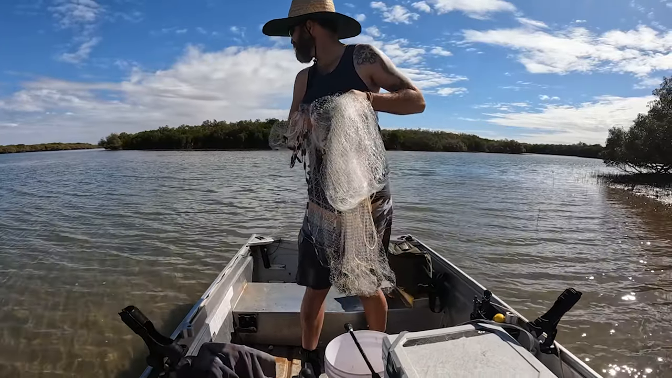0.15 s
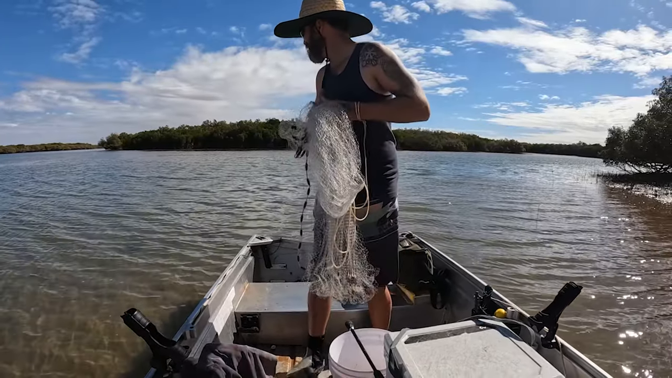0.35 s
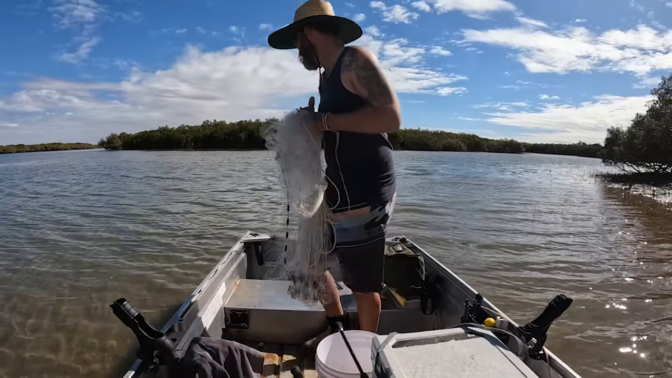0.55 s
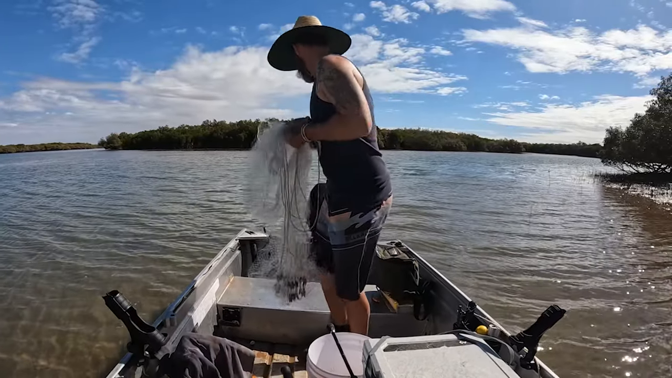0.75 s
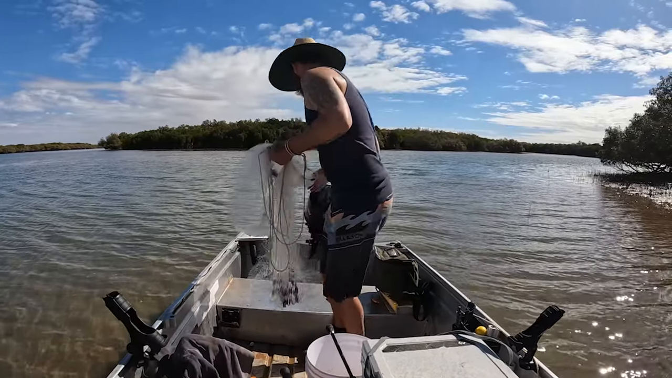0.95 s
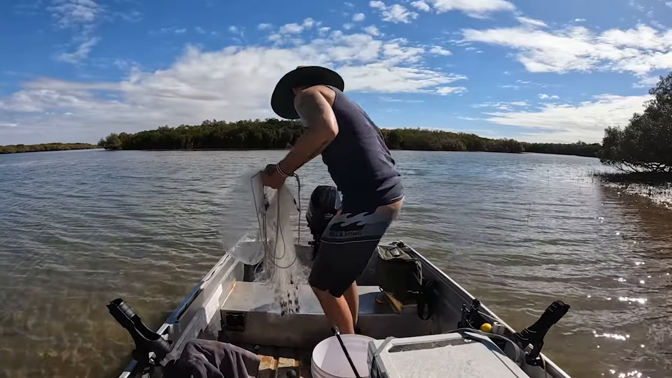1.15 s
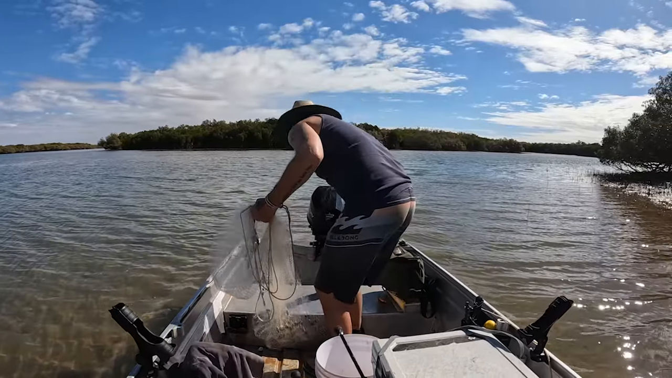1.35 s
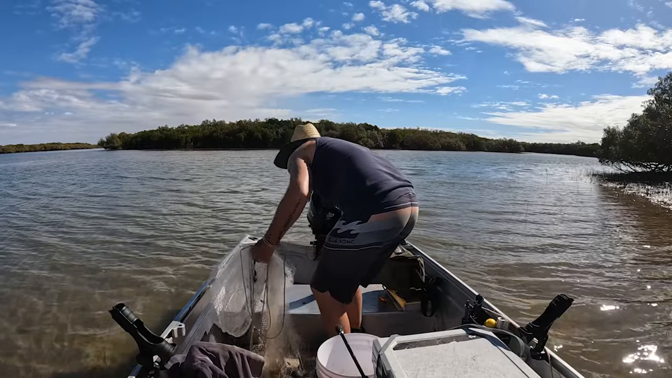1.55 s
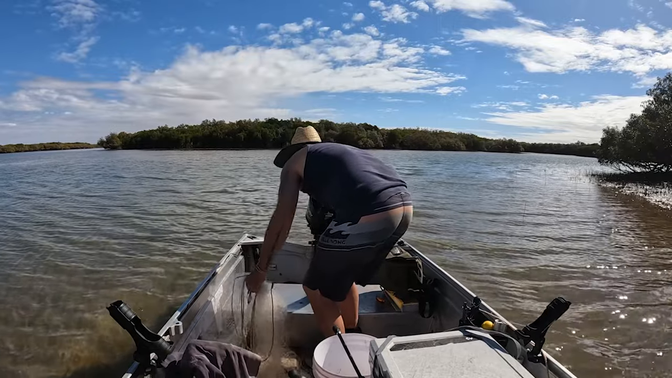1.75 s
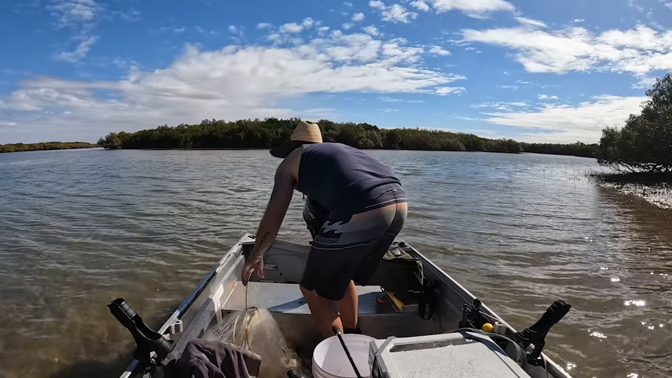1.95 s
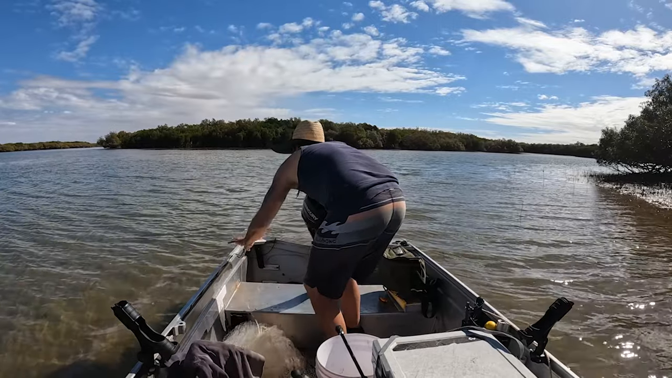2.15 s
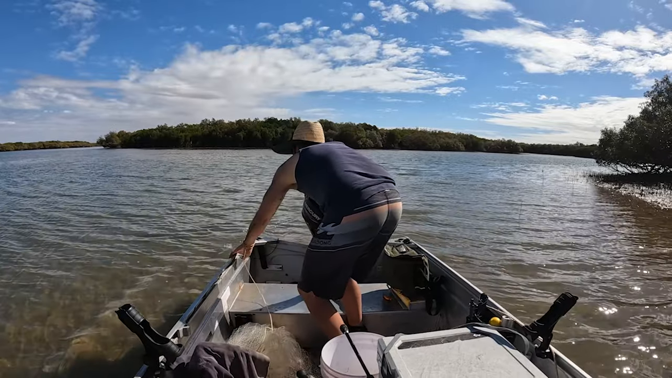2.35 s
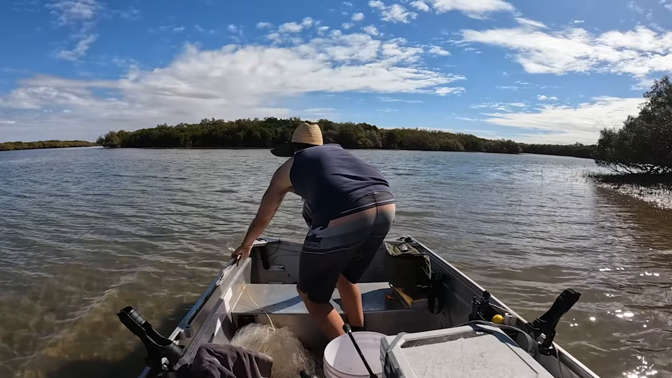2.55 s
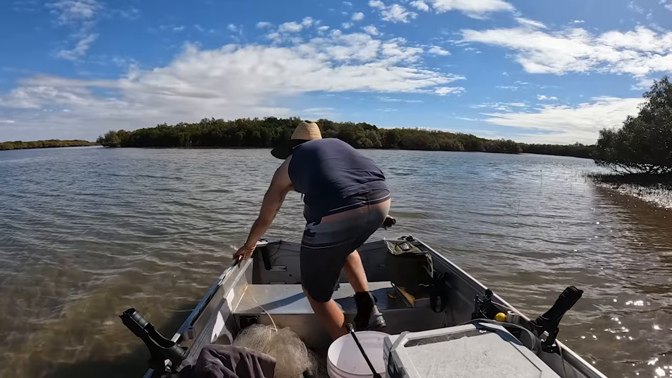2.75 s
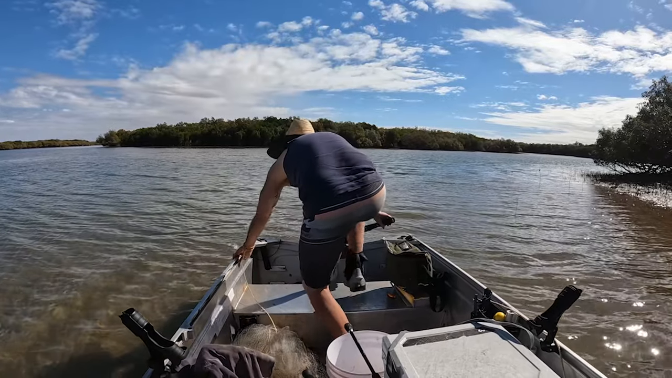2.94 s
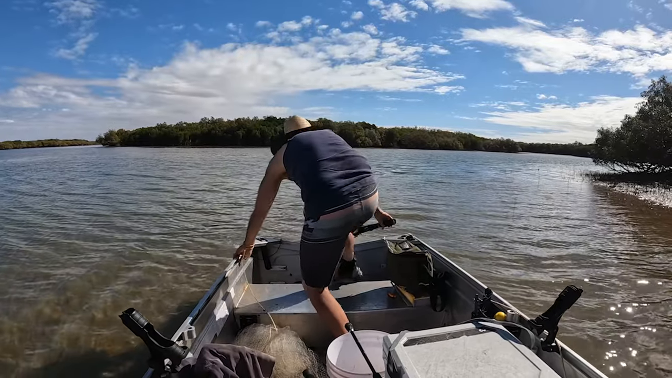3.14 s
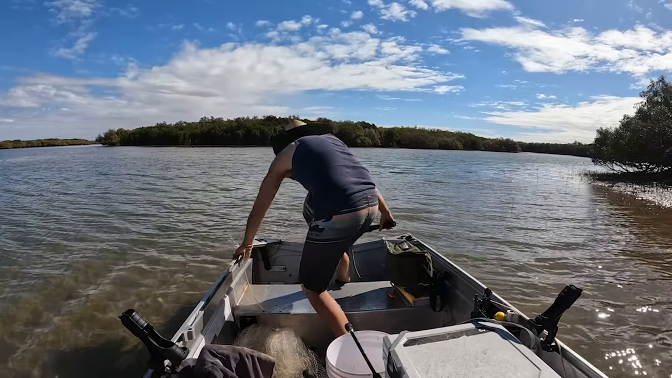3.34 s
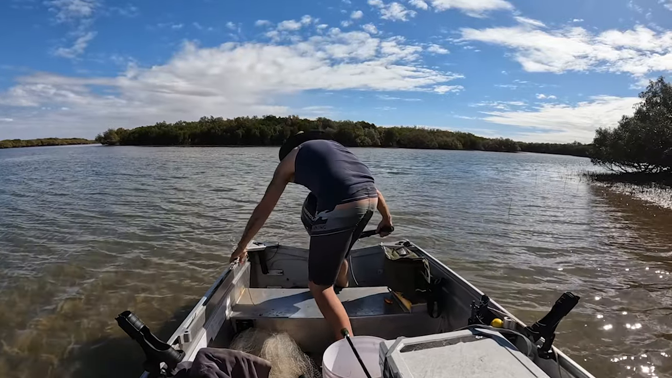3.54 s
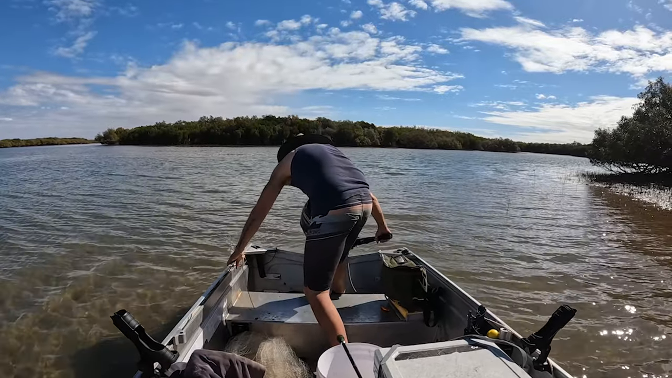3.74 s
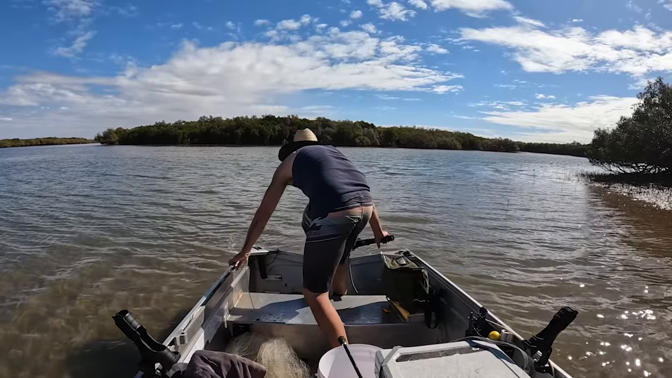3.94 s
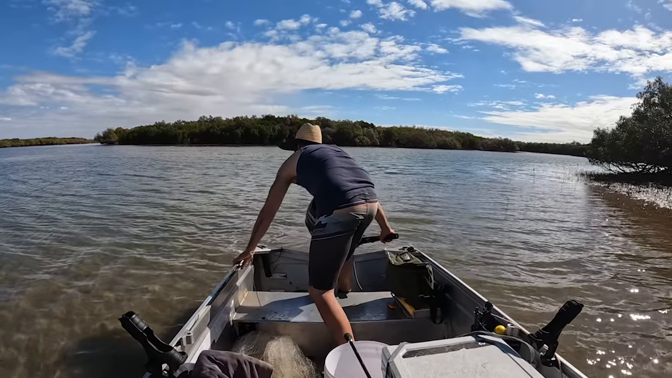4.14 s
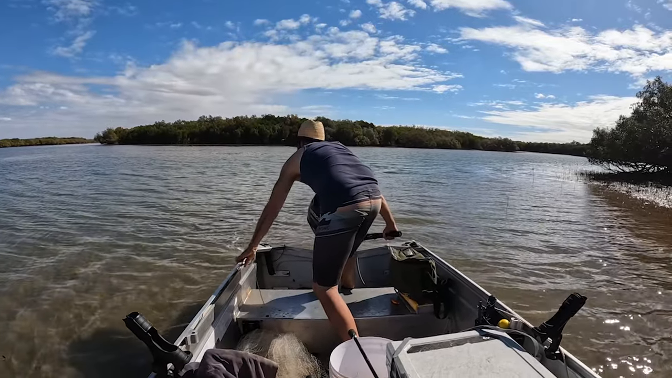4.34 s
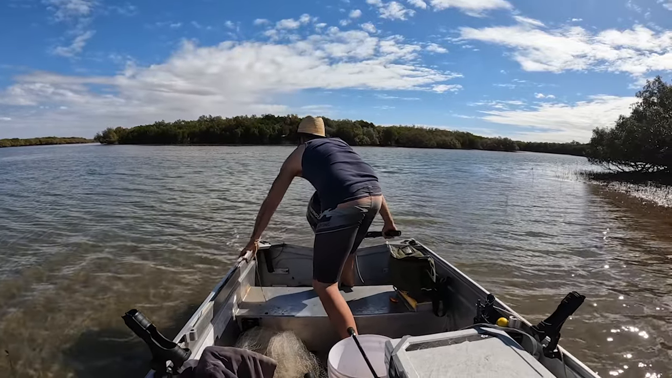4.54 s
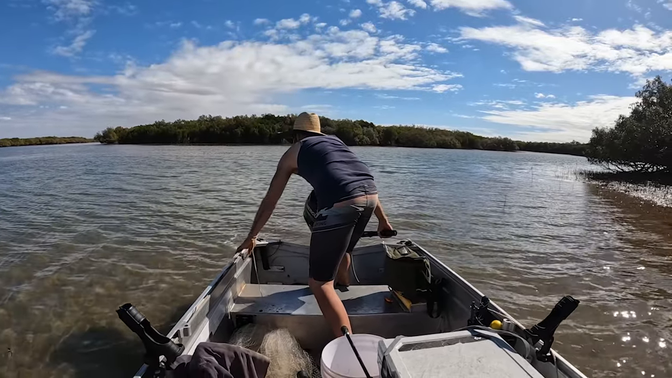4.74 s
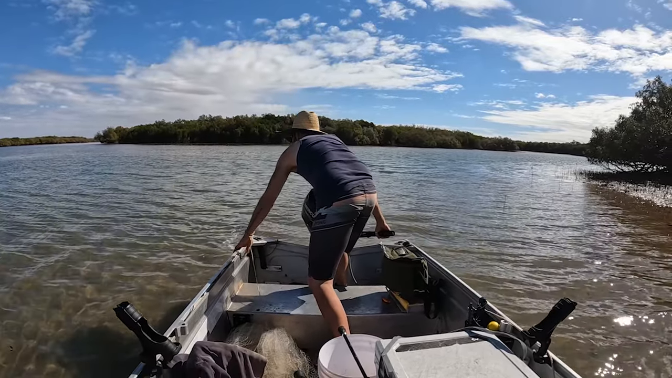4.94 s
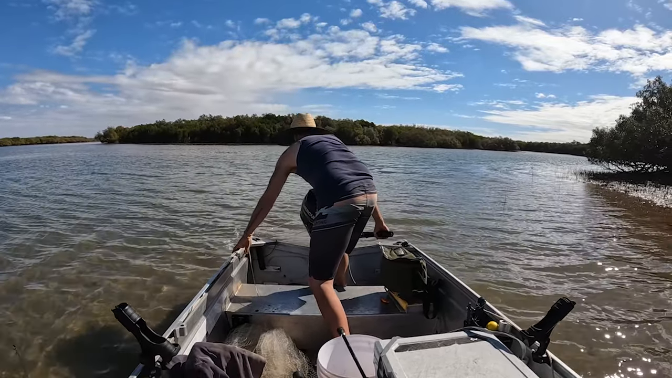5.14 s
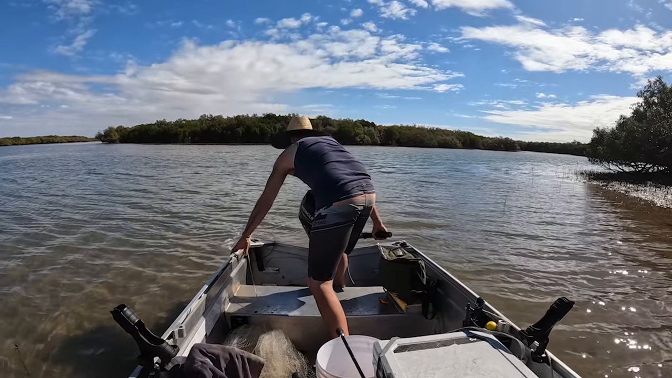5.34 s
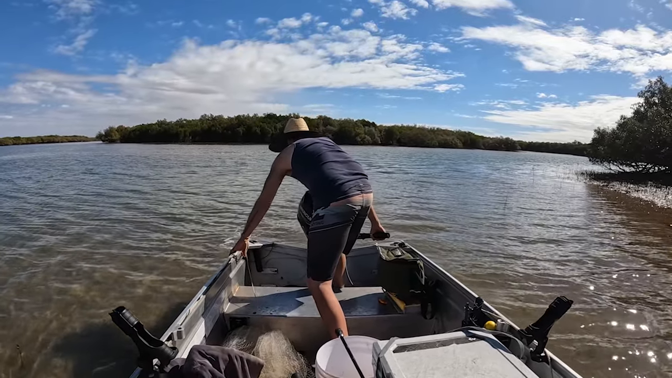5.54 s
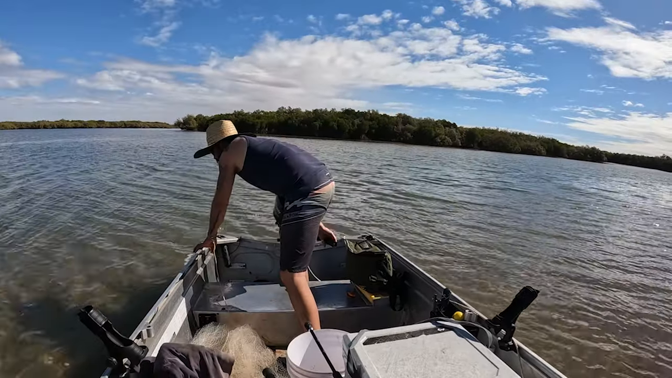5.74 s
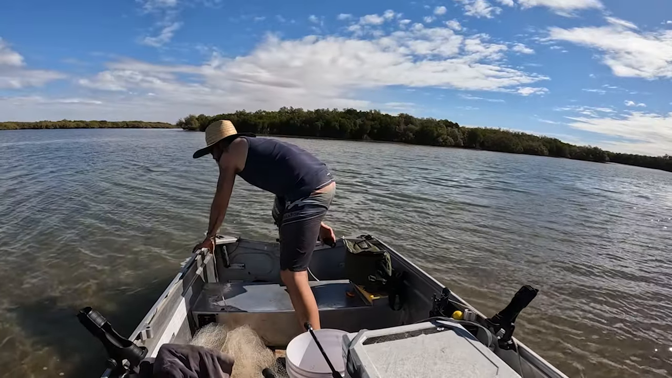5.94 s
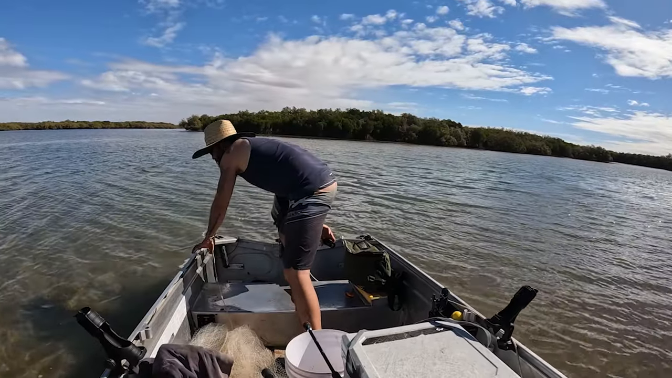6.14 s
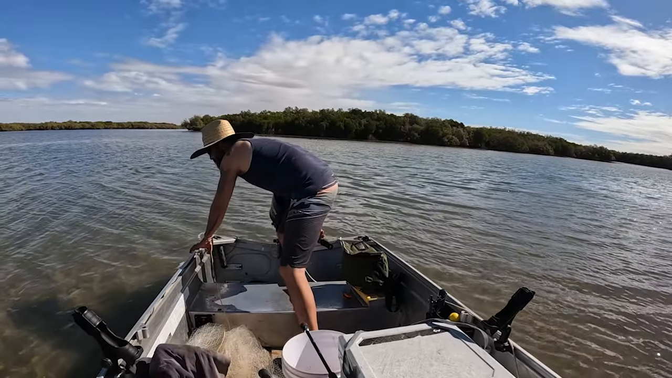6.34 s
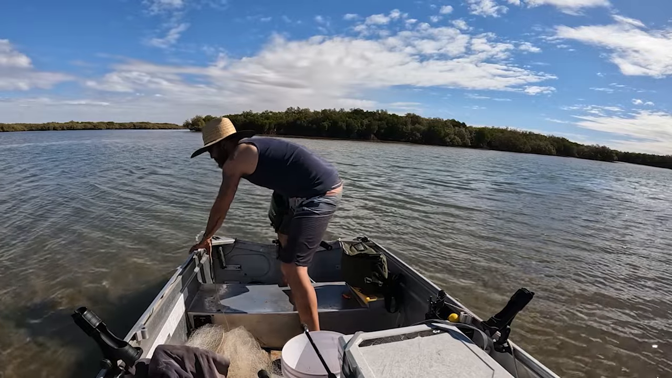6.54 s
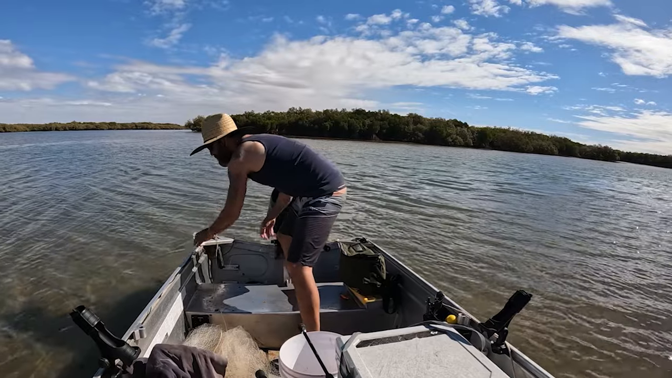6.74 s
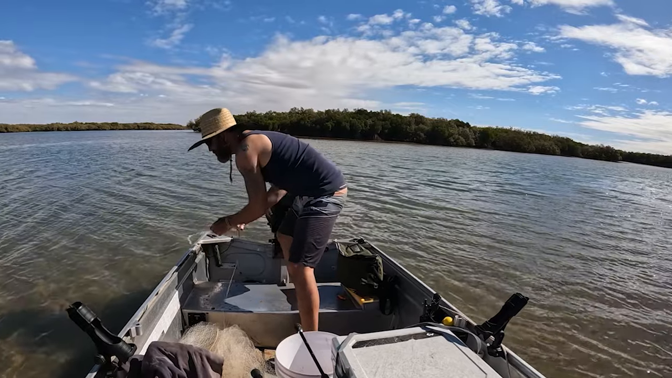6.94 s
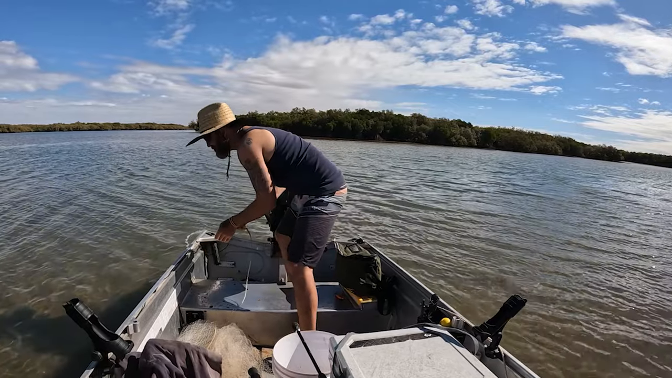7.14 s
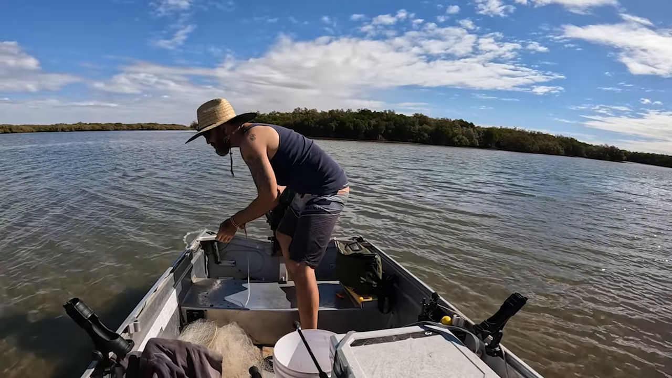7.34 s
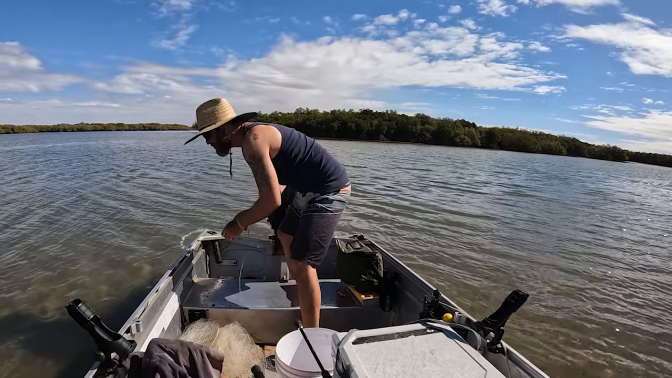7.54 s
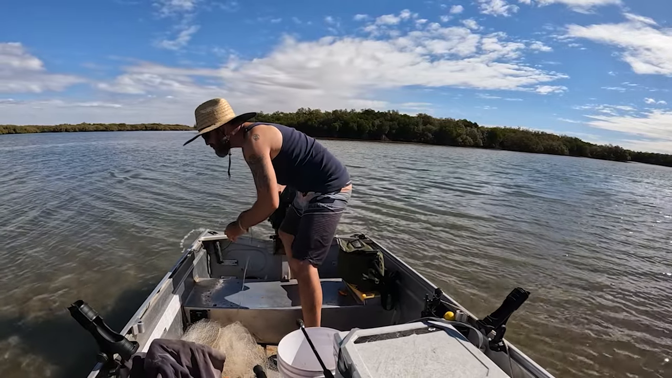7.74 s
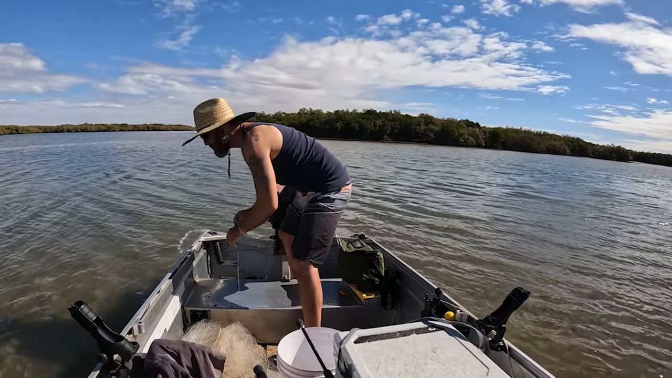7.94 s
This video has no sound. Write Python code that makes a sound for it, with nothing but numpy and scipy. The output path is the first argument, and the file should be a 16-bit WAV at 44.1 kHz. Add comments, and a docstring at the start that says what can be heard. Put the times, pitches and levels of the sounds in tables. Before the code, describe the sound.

Wet mesh rustles and lead weights clatter loudly into a ringing aluminium boat, hollow foot thuds, an idling outboard chugging, water lapping, wind rumbling.

```python
"""A man gathers a wet cast net in a small aluminium dinghy: mesh rustles in bursts of tiny snaps, feet thud.
Its lead weights drop on the floor, densest near 2 s, as noise clattering through ringing hull plates.
The idling outboard (rings and noise bands once a turn) swells early, is muffled after 2.2 s, returns from 5.3 s.
He steps to the stern meanwhile; wet hands and soles squeak now and then as gliding narrow-band noise.
Coloured noise throughout: water laps and bubbles, air hisses, wind rumbles on the microphone."""
import sys
import numpy as np
from scipy import signal
from scipy.fft import rfft, irfft
from scipy.io import wavfile
from scipy.ndimage import uniform_filter1d

SR = 44100
rng = np.random.default_rng(int(sys.argv[2]) if len(sys.argv) > 2 else 0)


def generate_wav(sig):
    """Save sig (samples, or channels by samples) to the path in sys.argv[1] as 16-bit PCM at SR."""
    pcm = np.round(np.clip(np.atleast_2d(sig).T, -1, 1) * 32767).astype(np.int16)
    wavfile.write(sys.argv[1], SR, pcm)


N = 352353
TIME = np.arange(N) / SR

# showers of lead weights landing: (time [s], level [dB], pouring time [s], low-pass corner [Hz])
SHOWERS = [(0.435, -36.5, 0.072, 900), (0.765, -27, 0.044, 3380), (.84, -38.5, 0.17, 1000),
           (1.511, -30.5, 0.0068, 1800), (1.68, -21, 0.0017, 1400), (1.698, -19.5, 0.044, 4500),
           (1.768, -23, 0.048, 3970), (1.857, -27.5, 0.015, 990), (1.997, -32, 0.011, 2980),
           (2.068, -19, 0.053, 7500), (2.14, -18, 0.01, 3500), (2.172, -17, 0.0048, 3400),
           (2.209, -29.5, 0.011, 694), (2.321, -35.5, 0.024, 1500), (2.574, -46.5, 0.035, 3970),
           (4.383, -39.5, 0.025, 3000)]
# spells of free exhaust: (opens [s], closes [s], swell time [s], exhaust level [dB], ticking level [dB])
OPEN_SPELLS = [(.12, 2.233, 1.7, -37, -61), (5.28, 8.0, 1.83, -36, -51.5)]

TURNS_PER_S, FIRST_TURN_S = 18.985, 0.041
SHOWER_RISE_S, SHOWER_SETTLE_S = 0.009, 0.013


def from_db(db):
    """Decibels to gain."""
    return 10 ** (np.asarray(db) / 20)


def rms_one(x):
    """Scale to unit power."""
    return x / np.sqrt(np.mean(x ** 2) + 1e-20)


def in_time(rows):
    """One curve per column, joined by straight lines."""
    s, *columns = np.transpose(rows)
    return [np.interp(TIME, s, c) for c in columns]


def colour(x, points):
    """Causal (minimum-phase) filter with the given (Hz, dB) response."""
    size = 2 ** 19
    hz, db = np.transpose(points)
    bin_hz = np.arange(size // 2 + 1) * SR / size
    log_gain = np.log(from_db(np.interp(np.log(bin_hz + 1), np.log(hz), db)))
    # fold the cepstrum onto positive time
    cepstrum = irfft(log_gain)[:size // 2]
    response = np.exp(2 * rfft(cepstrum, size) - cepstrum[0])
    return irfft(rfft(x, size) * response)[:len(x)]


def resonance(x, hz, width_hz):
    """Two-pole band-pass, gain 1 on top."""
    r = np.exp(-np.pi * width_hz / SR)
    zeros = np.array([1, 0, -1]) * (1 - r * r) / 2
    poles = [1, -2 * r * np.cos(2 * np.pi * hz / SR), r * r]
    return signal.lfilter(zeros, poles, x + 1e-18)


def evened(x, seconds):
    """Unit power over every stretch of this length."""
    power = uniform_filter1d(x ** 2, max(int(seconds * SR), 2))
    return x / np.sqrt(np.abs(power) + 1e-12)


def grains(per_s, spread_db):
    """Random clicks of uneven size, unit power."""
    sizes = from_db(spread_db * np.minimum(rng.exponential(1, N), 4)) * rng.choice([-1, 1], N)
    return rms_one(sizes * (rng.random(N) < per_s / SR))


def swell(s, rise, decay, hold=0):
    """Samples that an event covers, and its envelope: a quick build-up, perhaps a hold, then a free decay."""
    first = max(int((s - 3 * rise) * SR), 0)
    last = min(int((s + hold + 8 * decay) * SR), N)
    span = slice(first, last)
    age = TIME[span] - s
    return span, np.exp(-.5 * (np.minimum(age, 0) / rise) ** 2 - np.maximum(age - hold, 0) / decay)


def same_power(body, x):
    """Pass x through a body that neither adds nor removes power from white noise."""
    return body(x) / np.linalg.norm(body(signal.unit_impulse(SR // 4)))


def boat_echo(x, t60_s=0.22, dull_hz=2500):
    """Sound lingers briefly and dully between the metal sides."""
    age = TIME[:SR // 2]
    dull_noise = signal.lfilter(*signal.butter(1, dull_hz, fs=SR), rng.standard_normal(len(age)))
    tail = dull_noise * from_db(-60 * age / t60_s)
    return signal.fftconvolve(x, tail / np.linalg.norm(tail))[:N] * np.sqrt(dull_hz / (SR / 2))


def plates(x, width_hz=20):
    """Each mode of the plates changes the level at its own pitch and rings on a little."""
    # plate modes: (frequency [Hz], lift [dB])
    modes = [(636, 6.5), (829, 5.5), (926, 2.5), (958, -4), (1158, 1), (1270, 1.5), (1400, -0.5), (1500, 2),
             (1835, -2.5), (1971, 6.5), (2218, 3.5), (2349, 0), (2713, 0.5), (2950, 3), (3064, 3),
             (3700, 5)]
    for hz, db in modes:
        x = x + (from_db(db) - 1) * resonance(x, hz, width_hz)
    return x


def hull(x):
    """A hard contact on the floor clatters and leaves the plates ringing."""
    # clatter of lead on the floor: (frequency [Hz], relative density [dB per Hz])
    clatter = [(60, 3.5), (170, 3), (290, 10), (420, 2.5), (520, -4.5), (720, 0.5), (950, 0.5), (1400, 0.5),
               (2000, -6.5), (3200, -6), (4200, -13), (5500, -20), (7000, -24.5), (10000, -35),
               (16000, -24)]
    return plates(colour(x, clatter))


def openness(opens, closes, swell_s, choking_s=0.059):
    """How freely the exhaust sounds in one spell, 0-1: swells slowly, is choked quickly."""
    opening = 1 - np.exp(-np.maximum(TIME - opens, 0) / swell_s)
    return opening * np.exp(-np.maximum(TIME - closes, 0) / choking_s)


def air(level_db=-53):
    """Steady hiss of open water and breeze."""
    # air spectrum: (frequency [Hz], relative density [dB per Hz])
    air_colour = [(200, 13), (500, -5), (1300, 2.5), (2000, -5.5), (5500, -12), (9000, -21), (16000, -20)]
    return from_db(level_db) * rms_one(colour(rng.standard_normal(N), air_colour))


def wind(gain_db=2.5):
    """Eddies at the microphone port: evened low-pitched noise on a level curve."""
    # wind strength: (time [s], level ahead of gain [dB])
    strength = [(0.0, -29.5), (0.29, -34), (0.35, -25), (.56, -27), (.8, -30.5), (1.09, -34), (1.2, -28.5),
                (1.45, -28), (1.6, -31), (2.89, -38), (3.89, -33), (4.94, -38.5), (6.27, -31.5), (6.5, -33),
                (7.27, -27.5), (7.48, -26), (7.6, -33), (7.99, -32)]
    # wind spectrum: (frequency [Hz], relative density [dB per Hz])
    wind_colour = [(12, -8.5), (24, 0), (40, -1), (65, -4.5), (110, -5), (170, -11), (240, -17), (330, -20),
                   (480, -29), (1000, -77.5)]
    level_db, = in_time(strength)
    return from_db(level_db + gain_db) * evened(colour(rng.standard_normal(N), wind_colour), 0.0453)


def stirring(calm_db=-54.5, churn_db=-47.5, slosh_rise_s=0.097, slosh_decay_s=0.14):
    """How hard the water moves: calm lapping, churn of the open exhaust, and each slosh."""
    # sloshes as the boat rocks or the wet net swings: (time [s], level [dB])
    sloshes = [(.02, -42), (.37, -38), (.98, -41.5), (3.5, -44), (3.85, -57), (4.42, -46)]
    level = np.full(N, from_db(calm_db))
    for opens, closes, swell_s, *_ in OPEN_SPELLS:
        level += from_db(churn_db) * openness(opens, closes, swell_s)
    for s, db in sloshes:
        span, shape = swell(s, slosh_rise_s, slosh_decay_s)
        level[span] += from_db(db) * shape
    return level


def wash(fizz=0.66, lap_db=1.7, bubbles_db=-15):
    """Hiss of ripples that swells with each small lap, and tiny bubbles bursting in it."""
    # water spectrum: (frequency [Hz], relative density [dB per Hz])
    wash_colour = [(100, 1), (300, 12.5), (550, 7), (1300, -8), (1700, -11), (3000, -12), (5500, -20),
                   (9000, -28.5), (16000, -44)]
    ripples = rng.standard_normal(N) + fizz * grains(per_s=900, spread_db=8.0)
    water = rms_one(colour(ripples, wash_colour))
    laps = np.interp(TIME, np.linspace(0, TIME[-1], 110), rng.standard_normal(110))
    bubbles = 0
    for hz in np.geomspace(700, 6500, 14):
        # width sets the ring to some twenty cycles
        bubbles = bubbles + resonance(grains(per_s=8, spread_db=2.0), hz, hz / 20)
    bubbles = rms_one(colour(bubbles, wash_colour))
    return stirring() * from_db(lap_db * laps) * (water + from_db(bubbles_db) * bubbles)


def chugs(turns, rise_turns=0.021, decay_turns=0.07, jitter_s=0.0009, uneven_db=1.3):
    """Every firing rings the same resonances in the same order; only its moment and strength vary."""
    # exhaust and leg resonances: (start [turns], hold [turns], frequency [Hz], relative level [dB])
    rings = [(-.22, 0.34, 690, -0.5), (-.25, 0.29, 600, -6.5), (-.08, 0.23, 513, -4), (-.15, 0.31, 346, -5),
             (.2, 0.6, 430, -5.5), (-.24, 0.18, 1290, -3), (-.3, 0.26, 1100, -6), (-.24, .2, 850, -5),
             (-.3, 0.36, 950, -11.5), (-.47, 0.11, 1345, -7.5), (-.47, 0.13, 1195, -15),
             (-.24, 0.12, 1390, -14), (.12, 0.27, 800, -8), (.3, 0.18, 700, -11), (-.24, 0.13, 1300, -20),
             (0.12, 0.2, 1440, -16)]
    stroke, since_s = 0, TIME[:SR // 6]
    for k, (start, hold, hz, db) in enumerate(rings):
        # one turn of delay makes room for negative starts
        age = np.maximum(since_s * TURNS_PER_S - 1 - start, 0)
        gate = (1 - np.exp(-age / rise_turns)) * np.exp(-np.maximum(age - hold, 0) / decay_turns)
        stroke = stroke + (-1) ** k * from_db(db) * gate * np.sin(2 * np.pi * hz * age / TURNS_PER_S)
    due = np.flatnonzero(np.diff(np.floor(turns)) > 0)
    late, strong = rng.standard_normal((len(due), 2)).T
    moments = np.clip(due + (jitter_s * SR * late).astype(int), 0, N - 1)
    firings = np.zeros(N)
    firings[moments] = from_db(uneven_db * strong)
    return rms_one(signal.fftconvolve(firings, stroke)[:N])


def strokes(table, turns, rise_turns=0.0094, decay_turns=0.085, uneven_db=1.24, even_s=0.0097):
    """Every turn fires the same sharply bounded bands of noise: they open, hold and die."""
    out, number = 0, np.floor(turns).astype(int)
    for start, hold, low_hz, high_hz, db in table:
        band = signal.butter(3, [low_hz, high_hz + 1], "band", fs=SR, output="sos")
        rush = evened(signal.sosfilt(band, rng.standard_normal(N)), even_s)
        age, gate = (turns - start) % 1, 0
        # this turn, and what is left of the one before
        for a in (age, age + 1):
            gate = gate + (1 - np.exp(-a / rise_turns)) * np.exp(-np.maximum(a - hold, 0) / decay_turns)
        strength = from_db(uneven_db * rng.standard_normal(256))[number % 256]
        out = out + from_db(db) * strength * gate * rush
    return rms_one(out)


def outboard(muffled_exhaust_db=-61, muffled_ticking_db=-66, puff_db=-6, echo_db=-16):
    """An idling engine: one exhaust chuff and one round of ticking per turn, blurred by the boat."""
    # slight hunting of the idle: (time [s], lag [turns])
    idle_lag = [(1.09, .03), (1.35, -.15), (1.6, .14), (5.5, .1), (6.26, -.07), (6.8, .08), (7.33, -.09),
                (7.8, .02)]
    # rush of gas in a turn: (start [turns], hold [turns], lowest [Hz], highest [Hz], relative level [dB])
    puffs = [(-.48, 0.11, 815, 1440, 1.5), (-.25, 0.2, 547, 1410, 1), (.05, 0.29, 330, 1160, 1)]
    # ticking of the mechanism: (start [turns], hold [turns], lowest [Hz], highest [Hz], relative level [dB])
    ticks = [(.06, 0.17, 2520, 2700, 1.2), (0.067, 0.31, 1860, 2500, 1.7), (-.48, 0.22, 2090, 2530, -0.38),
             (.04, 0.2, 2500, 5100, 0.5), (-.27, 0.11, 2600, 6600, -1.5), (-.3, 0.47, 1450, 2190, 0.28)]
    turns = (TIME - FIRST_TURN_S) * TURNS_PER_S - in_time(idle_lag)[0]
    exhaust, ticking = from_db(muffled_exhaust_db), from_db(muffled_ticking_db)
    for opens, closes, swell_s, exhaust_db, ticking_db in OPEN_SPELLS:
        free = openness(opens, closes, swell_s)
        exhaust = exhaust + from_db(exhaust_db) * free
        ticking = ticking + from_db(ticking_db) * free
    chuffs = chugs(turns) + from_db(puff_db) * strokes(puffs, turns)
    engine = exhaust * chuffs + ticking * strokes(ticks, turns)
    return engine + from_db(echo_db) * boat_echo(engine)


def squeaks(rise_s=0.0013, release_s=0.012):
    """Wet surfaces stick and slip: a rough, wavering note that holds its pitch or glides."""
    # wet hands, soles, rope: (time [s], level [dB], hold [s], starting pitch [Hz], glide [Hz/s], width [Hz])
    slips = [(0.413, -40, 0.04, 793, 2802, 159), (.89, -46, 0.0088, 2660, -2, 198),
             (3.965, -47.5, 0.0095, 2600, -6000, 400), (3.967, -55, 0.0073, 4000, 0, 1300),
             (4.002, -55.5, 0.028, 3200, -3500, 600), (4.037, -40.5, 0.017, 1393, -900, 400),
             (7.262, -49.5, 0.06, 2195, -2, 1100)]
    out, white = np.zeros(N), rng.standard_normal((2, N))
    for s, db, hold, hz, glide, width_hz in slips:
        span, shape = swell(s, rise_s, release_s, hold)
        low_pass = signal.butter(2, width_hz / 2, fs=SR, output="sos")
        a, b = signal.sosfilt(low_pass, white[:, span])
        pitch_hz = hz + glide * np.clip(TIME[span] - s, 0, hold)
        phase = 2 * np.pi * np.cumsum(pitch_hz) / SR
        out[span] += from_db(db) * shape * evened(a * np.cos(phase) + b * np.sin(phase), 0.02)
    return out


def spits(from_turn=116, to_turn=137, place_turns=0.17, level_db=-46.5, uneven_db=2.5):
    """For a while the exhaust spits spray once a turn, at random levels; returns rustle rows."""
    length_s, sizzle_db = 0.01, -9
    times = FIRST_TURN_S + (np.arange(from_turn, to_turn) + place_turns) / TURNS_PER_S
    return [(s, level_db + uneven_db * rng.uniform(-1.1, 1), length_s, sizzle_db) for s in times]


def rustles(sizzle_hz=11000, rise_share=0.47, dragged_db=-33.5, dragged_sizzle_db=-0.5):
    """Strands slip over each other in short bursts of tiny snaps; the taut ones sizzle on top."""
    # flicks of wet mesh and spray: (time [s], level [dB], length [s], sizzle re level [dB])
    flicks = [(0.146, -39, 0.017, -6), (0.228, -40.5, 0.014, -4), (0.303, -33.5, 0.02, -6),
              (0.364, -51, 0.0092, 4), (0.43, -45.5, 0.062, -8), (0.584, -38, 0.015, -19),
              (0.699, -38.5, 0.0073, -26), (0.743, -42.5, 0.022, -13), (0.895, -36, 0.017, -20),
              (0.991, -32.5, 0.015, -13), (1.053, -38, 0.0095, -20), (1.209, -35.5, 0.014, -14),
              (1.376, -33.5, 0.019, -11), (1.423, -36.5, 0.01, -10), (1.578, -35.5, 0.014, -12),
              (1.657, -39, 0.011, -14), (1.989, -50, 0.0044, 7), (2.09, -40, 0.034, -4),
              (2.746, -42.5, 0.013, -4), (2.782, -45, 0.019, -23), (3.008, -45.5, 0.0063, 1),
              (3.595, -38, 0.012, -7), (3.695, -40.5, 0.014, -6), (3.744, -41, 0.02, -10),
              (3.861, -41.5, 0.031, -3), (4.329, -45, 0.01, -11), (4.382, -40, 0.0094, -7),
              (4.587, -43.5, 0.015, -13), (5.181, -49, 0.012, 1), (6.135, -42.5, 0.011, -12),
              (6.408, -41.5, 0.0087, -9), (6.453, -34.5, 0.013, -30)]
    # mesh spectrum: (frequency [Hz], relative density [dB per Hz])
    mesh_colour = [(200, -14), (800, 11.5), (1500, 9), (2800, 7), (4500, 2), (6500, -3), (10000, -14.5),
                   (16000, -31)]
    # every shower drags hissing mesh down with it
    dragged = [(s + pour / 2, db + dragged_db, SHOWER_SETTLE_S + pour / 2, dragged_sizzle_db)
               for s, db, pour, _ in SHOWERS]
    effort, sizzle = np.zeros(N), np.zeros(N)
    for s, db, length, sizzle_db in flicks + dragged + spits():
        span, shape = swell(s, rise_share * length, length)
        effort[span] += from_db(db) * shape
        sizzle[span] += from_db(db + sizzle_db) * shape
    snaps = effort * evened(grains(per_s=3800, spread_db=2.0), 0.015)
    slips = same_power(lambda x: colour(x, mesh_colour), snaps)
    high_pass = signal.butter(2, sizzle_hz, "high", fs=SR, output="sos")
    return slips + signal.sosfilt(high_pass, sizzle * evened(grains(per_s=4100, spread_db=6.5), 0.027))


def thuds(damping=0.91, tone=0.76, noise_share=0.97, scuff_db=-21, decay_contacts=2.67):
    """Soft blows shake a patch of hull, hollow on its main pitch; a little scuffing reaches the plates."""
    # feet and water on the hull: (time [s], level [dB], contact time [s], main pitch [Hz])
    blows = [(.146, -25, 0.023, 171), (0.353, -22.5, 0.016, 128), (.445, -32, 0.01, 423),
             (.527, -26.5, 0.0054, 400), (.534, -18, 0.0067, 188), (0.555, -28, 0.0025, 106),
             (0.678, -16.5, 0.0027, 308), (.701, -18.5, 0.0036, 390), (1.39, -20, 0.0066, 168),
             (2.6, -43, 0.02, 320), (3.446, -36.5, 0.0072, 442), (3.476, -29, 0.0091, 288),
             (3.528, -20.5, 0.0047, 320), (3.559, -24, 0.0085, 187), (3.891, -34.5, 0.012, 352),
             (4.33, -35.5, 0.005, 230), (4.35, -28.5, 0.029, 159), (4.448, -33.5, 0.0067, 403),
             (4.481, -28.5, 0.017, 158), (4.495, -41, 0.0033, 430), (5.2, -40.5, 0.019, 376),
             (6.151, -36.5, 0.0048, 270), (7.291, -26.5, 0.015, 168), (7.416, -24.5, 0.0067, 177)]
    # every shower also booms the floor, a moment later
    boom_db, boom_hz, lag_s, contact_s = -9, 197.7, 0.0052, 0.027
    landings = [(s + lag_s, db + boom_db, contact_s, boom_hz) for s, db, *_ in SHOWERS]
    boom, scuff, white = np.zeros(N), np.zeros(N), rng.standard_normal(N)
    for s, db, contact, hz in blows + landings:
        # softer blows die away more slowly
        span, shape = swell(s, contact, decay_contacts * contact)
        panel = resonance(resonance(white[span], hz, damping * hz), hz, 2 * damping * hz)
        panel = evened(panel, 0.0082)
        # shaped twice: the main mode is clearest just at the blow
        hollow = tone * np.sin(2 * np.pi * hz * (TIME[span] - s)) * shape
        # a soft contact leaves little above that mode
        soft = signal.butter(4, 1.4 * hz, fs=SR, output="sos")
        boom[span] += from_db(db) * signal.sosfilt(soft, shape * (noise_share * panel + hollow))
        scuff[span] += from_db(db + scuff_db) * shape * white[span]
    return boom + same_power(hull, resonance(resonance(scuff, 1000, 1000), 920, 2000))


def knocks(rise_s=0.00057, decay_s=0.0078, width_share=0.44):
    """Single hard knocks: each a sudden crack that dies quickly in the plates."""
    # lead and gear on the plates, and a few hard engine strokes:
    # (time [s], level ahead of plates [dB], centre [Hz])
    hits = [(0.116, -41, 1500), (.294, -40, 1400), (0.458, -35, 890), (0.662, -37.5, 695),
            (0.697, -30.5, 1100), (0.769, -31, 1710), (.783, -30, 1170), (0.813, -37, 1490),
            (.99, -38, 900), (1.206, -36, 2020), (1.288, -36.5, 1080), (1.454, -32.5, 1170),
            (1.693, -25.5, 4300), (1.715, -20, 1810), (1.739, -25, 2410), (1.789, -27, 1200),
            (2.063, -30, 2700), (2.095, -15.5, 1890), (2.112, -27.5, 3660), (2.141, -20, 2200),
            (2.171, -32, 4000), (2.561, -49, 895), (2.741, -43, 2400), (3.466, -45, 1400),
            (3.524, -38, 1300), (3.543, -36.5, 825), (3.735, -43, 1910), (3.847, -48, 3000),
            (3.893, -39, 900), (4.144, -45.5, 2200), (4.324, -32, 930), (4.424, -40, 1200),
            (4.439, -40, 1000), (4.911, -52, 3400), (5.194, -41, 810)]
    out, white = np.zeros(N), rng.standard_normal(N)
    for s, db, hz in hits:
        span, shape = swell(s, rise_s, decay_s)
        width_hz = width_share * hz
        crack = resonance(resonance(white[span], hz, width_hz), hz, width_hz)
        out[span] += from_db(db) * shape * evened(crack, 0.0037)
    return plates(out)


def weights(clump_decay_s=0.0031, clump_db=2.0, loose_share=0.2):
    """Each shower is a rattle of leads landing in clumps, loose ones between; those on mesh sound duller."""
    keep = np.exp(-1 / (clump_decay_s * SR))
    clumps = signal.lfilter([1 - keep], [1, -keep], grains(per_s=560, spread_db=clump_db) ** 2)
    leads = evened(np.sqrt(clumps + loose_share) * rng.standard_normal(N), 0.025)
    force = np.zeros(N)
    for s, db, pour, bright_hz in SHOWERS:
        span, shape = swell(s, SHOWER_RISE_S, SHOWER_SETTLE_S, pour)
        low_pass = signal.butter(1, bright_hz, fs=SR)
        force[span] += from_db(db) * signal.lfilter(*low_pass, leads[span] * shape)
    return same_power(hull, force)


def scene(floor_echo_db=-8):
    """Everything aboard, with the water and wind round it."""
    aboard = squeaks() + rustles() + thuds() + knocks() + weights()
    echo = from_db(floor_echo_db) * boat_echo(aboard)
    return (air() + wind() + wash() + outboard() + aboard + echo)[None]


def record(dry, cutoff_hz=15400):
    """The loudest peaks are rounded, the microphone's membrane colours the treble; the top is cut."""
    # waterproof microphone: (frequency [Hz], response [dB])
    microphone = [(5500, -0.5), (7100, -2), (7700, -7.5), (8800, -10.5), (9700, -6.5), (11200, -11.5),
                  (12300, 0.5), (13300, -19), (15500, -13)]
    rounded = .55 * np.tanh(dry[0] / .55)
    top_cut = signal.ellip(10, .3, 80, cutoff_hz, fs=SR, output="sos")
    return signal.sosfilt(top_cut, colour(rounded, microphone))[None]


dry = scene()
out = record(dry)
generate_wav(out)
```